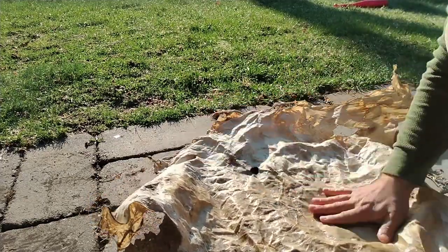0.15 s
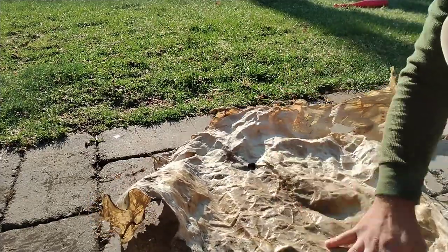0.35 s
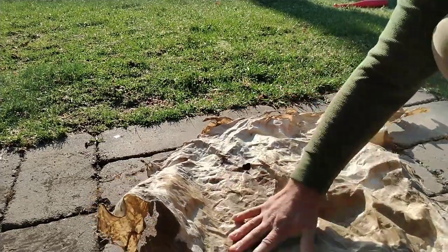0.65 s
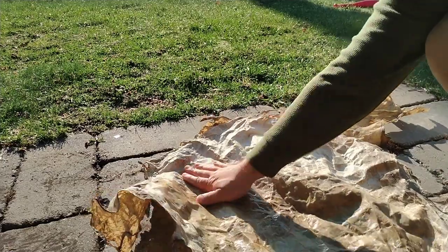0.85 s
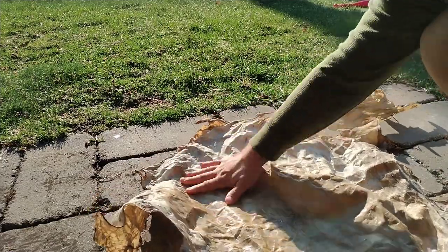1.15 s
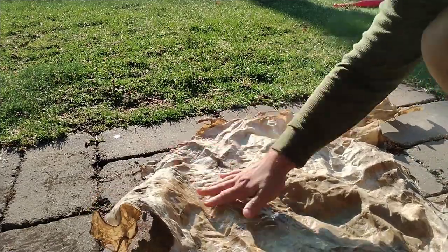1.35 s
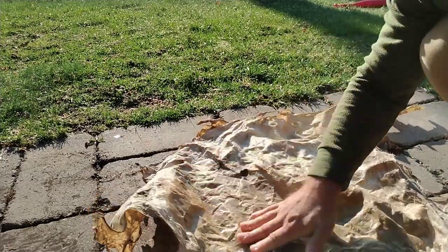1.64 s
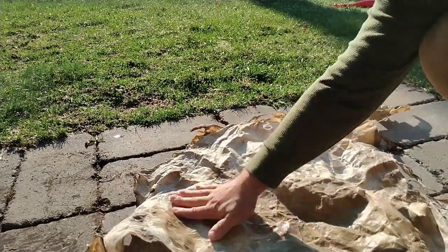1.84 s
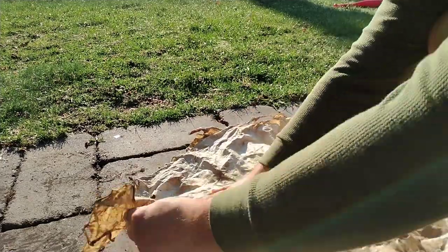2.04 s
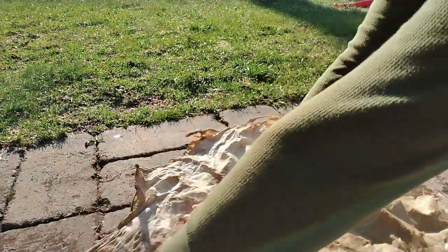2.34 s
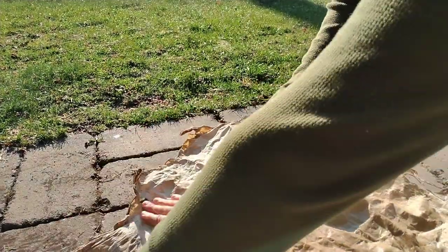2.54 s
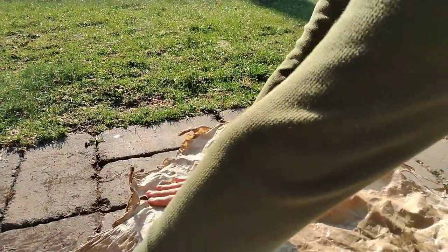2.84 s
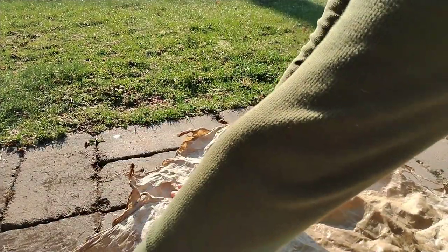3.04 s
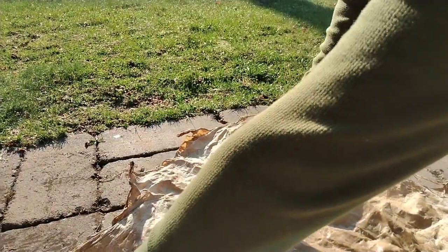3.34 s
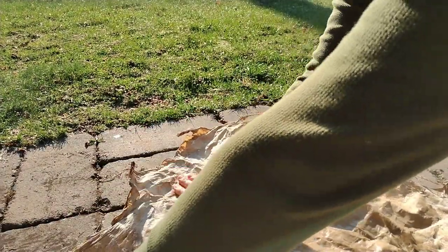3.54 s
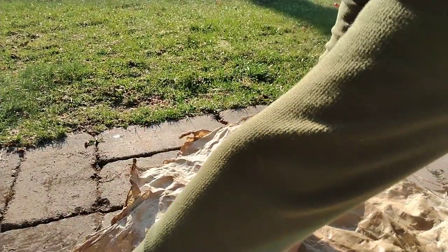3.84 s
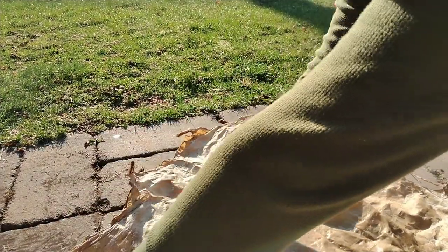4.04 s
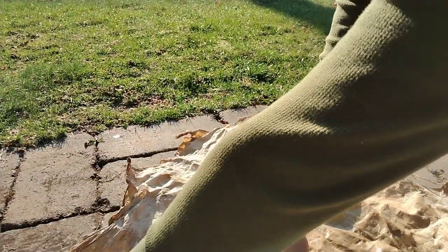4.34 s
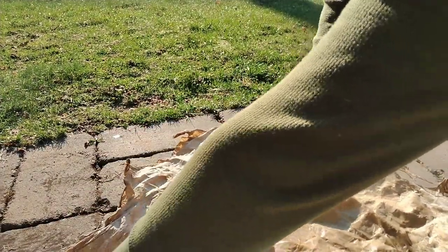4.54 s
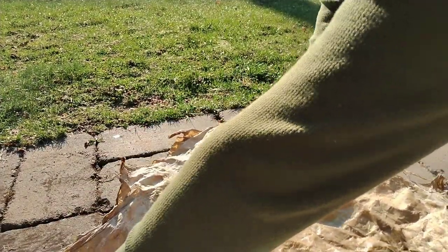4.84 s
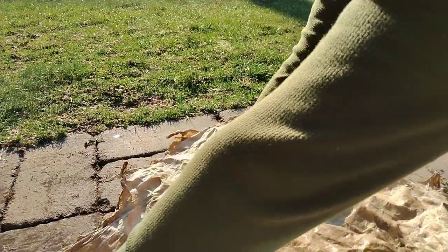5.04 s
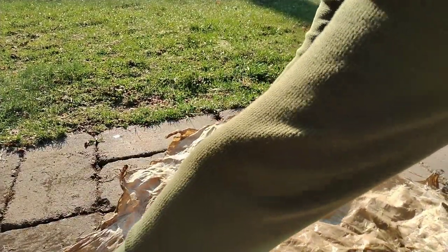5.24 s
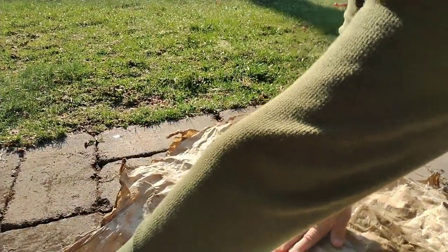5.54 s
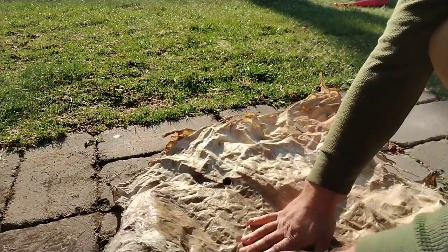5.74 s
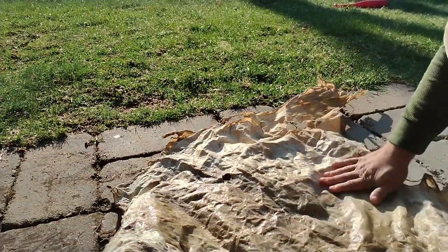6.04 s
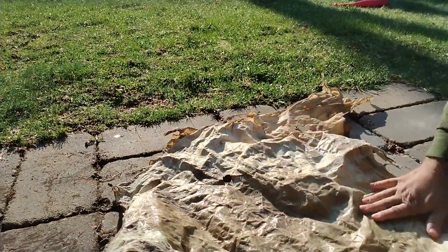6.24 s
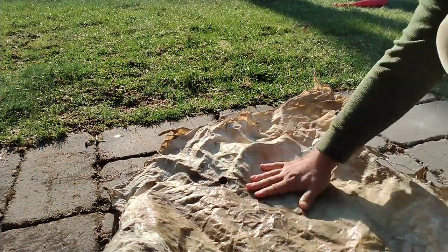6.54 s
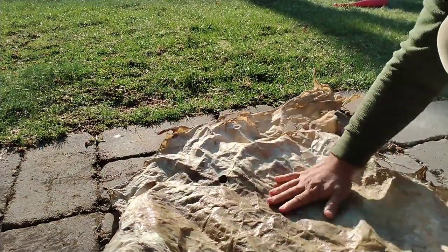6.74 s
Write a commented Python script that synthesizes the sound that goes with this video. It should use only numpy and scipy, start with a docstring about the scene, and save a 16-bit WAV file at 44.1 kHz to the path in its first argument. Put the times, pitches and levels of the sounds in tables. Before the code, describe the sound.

Very close outdoors, hands push and rub a stiff dried hide lying on paving. Short scrapes of skin on rough hide come in quick uneven runs, mixed with hollow papery knocks, bright ticks and sharp creasing cracks. The strongest rub comes just before two seconds, a dense snapping cluster follows around two and a half, and later pushes are sparser. A very faint low traffic hum lies beneath. Wide, detailed stereo with little reverberation.

```python
"""Hands pressing a stiff, dried hide

Two hands press a stiff hide flat on garden paving in quick, irregular pushes. Skin and hide scrape in
countless tiny slips of hiss, and the bending sheet rings as a hollow papery knock. Creases snap with a
tick, a crack and a short ring; thin wrinkles mostly tick. The resting hands drag lightly, and a low ring
swells in four deep thuds as the weight shifts. Beneath lie a low hum, likely far traffic, and a faint tone.
"""
import sys
import numpy as np
from scipy import signal
from scipy.fft import rfft, irfft, next_fast_len
from scipy.io import wavfile
from scipy.ndimage import uniform_filter1d

SR = 44100
rng = np.random.default_rng(int(sys.argv[2]) if len(sys.argv) > 2 else 0)


def to_wav(sig):
    """Store sig (one row per channel, or 1-D mono) as 16-bit WAV at the path in sys.argv[1].

    Samples outside -1..1 are clipped; the rate is SR.
    """
    pcm = np.clip(np.atleast_2d(sig), -1, 1) * 32767
    pcm = np.round(pcm).astype(np.int16)
    wavfile.write(sys.argv[1], SR, pcm.T)  # frames by channels


N = 303408
TIME = np.arange(N) / SR
# Levels in the tables and functions are those of the sources, before the mix at the two microphone ports.


def from_db(db):
    """Turn decibels into a gain."""
    return 10 ** (np.asarray(db) / 20)


def rms_one(x):
    """Scale a sound to an rms (average strength) of one."""
    return x / np.sqrt(np.mean(x ** 2) + 1e-20)


def in_time(rows):
    """Join (seconds, value) rows into a curve with a value at every sample."""
    return np.interp(TIME, *np.transpose(rows))


def over_bins(points):
    """Join (Hz, value) rows into a curve over all frequencies of a long transform."""
    hz, value = np.transpose(points)
    bin_hz = np.fft.rfftfreq(next_fast_len(N), 1 / SR)
    return np.interp(np.log(bin_hz + 1), np.log(hz), value)


def shaped(x, gain):
    """Make each frequency louder or softer by its own gain."""
    size = next_fast_len(N)
    return irfft(rfft(x, size) * gain, size)[..., :N]


def band(x, low_hz, high_hz):
    """Keep mainly the frequencies between two limits."""
    limits = [low_hz, min(high_hz, .45 * SR)]
    sos = signal.butter(2, limits, "band", fs=SR, output="sos")
    return signal.sosfilt(sos, x + 1e-18)


def drift(rate_hz):
    """Wander slowly at random, with an rms of about one."""
    step = 40   # samples between the computed points
    r = np.exp(-2 * np.pi * rate_hz * step / SR)
    noise = rng.standard_normal(N // step + 2002)
    slow = signal.lfilter([1], [1, -2 * r, r * r], noise)[2000:]   # drop the filter's start-up
    return np.interp(np.arange(N) / step, np.arange(len(slow)), rms_one(slow))


def grains(per_s, size_db):
    """Scatter clicks of random sign; size_db is the mean of their random gains in decibels."""
    born = rng.random(N) < per_s / SR
    size = from_db(size_db * rng.exponential(1, N))
    return born * size * rng.choice([-1, 1], N)


def evened(x):
    """Hold the short-term rms of a stereo pair near one."""
    power = uniform_filter1d(np.mean(x ** 2, axis=0), SR // 60)
    power = uniform_filter1d(power, SR // 100)
    return x / np.sqrt(np.abs(power) + 1e-12)


# Colour of the faint hush around the hum. Each row: frequency in Hz, level in dB per Hz.
HUSH_COLOUR = [(48, -19.5), (105, 11), (160, 4), (220, 2), (300, -5.5), (700, -7.5), (2000, -19),
               (15000, -75)]


def traffic(drone_hz=127, waver_hz=7, throb_db=3, drone_db=-75.5, hush_db=-69.5):
    """A distant engine drone wavers in pitch and strength over the faint hush of the garden."""
    hush = rms_one(shaped(rng.standard_normal((2, N)), from_db(over_bins(HUSH_COLOUR))))
    pitch_hz = drone_hz + waver_hz * drift(19.6)
    throb = from_db(throb_db * drift(43))
    drone = rms_one(np.sin(2 * np.pi * np.cumsum(pitch_hz) / SR) * throb)
    return drone * from_db(drone_db) + hush * from_db(hush_db)


# A faint background tone. The one row: start in seconds, end in seconds, level in dB at its fullest.
FAR_TONE_SPAN = (4.24, 6.06, -70)


def far_tone(low_hz=510, high_hz=580):
    """A narrow band of noise gives a faint, hollow tone that comes and goes."""
    start, end, db = FAR_TONE_SPAN
    swell = np.sin(np.pi * np.clip((TIME - start) / (end - start), 0, 1))
    tone = rms_one(band(rng.standard_normal(N), low_hz, high_hz))
    return from_db(db) * np.sqrt(np.abs(swell)) * tone


# Shifts of the weight. Each row: start in seconds, peak level of the swell in dB.
WEIGHT_SHIFTS = [(2.98, -57), (3.028, -52), (3.112, -51), (3.185, -54)]


def thuds(hz=127, ring_s=0.015):
    """Shifts of the weight on the hands feed one low ring, so the soft thuds merge into a rumble."""
    swell = 0
    for start, db in WEIGHT_SHIFTS:
        age = np.maximum(TIME - start, 0) / ring_s
        swell = swell + from_db(db) * age * np.exp(1 - age)   # peaks at an age of one
    return np.sin(2 * np.pi * hz * TIME) * swell


def moves(t, start, length, attack_s=0.015, release_s=0.009):
    """Power of each move, one per row: it takes up quickly, holds and lets go."""
    since, length = t - start[:, None], length[:, None]
    attack = np.clip(since / attack_s, 0, 1)
    release = np.exp(-np.maximum(since - length, 0) / release_s)
    return (attack * release) ** 2


# Pushes of a hand. Each row: start in seconds, length in seconds, scrape level in dB,
# scrape brightness in dB per octave, flexing level in dB. Both levels come before the trims in scene().
HAND_PUSHES = [(0.095,0.14,-52,4,-65.5), (0.23,0.095,-45.5,-1,-49), (0.452,0.096,-46.5,1.5,-48),
               (0.545,0.087,-47,-2,-60), (0.615,0.051,-39.5,-1,-48.5), (0.726,0.068,-41,0.5,-52),
               (0.811,0.043,-44,-1.5,-43.5), (0.873,0.03,-46.5,3,-48.5), (0.941,0.042,-42.5,0,-47),
               (1.025,0.1,-45.5,0,-85), (1.194,0.058,-40.5,0.5,-53.5), (1.271,0.088,-45.5,0.5,-55.5),
               (1.485,0.145,-50.5,2,-57), (1.659,0.047,-47,-3.5,-56.5), (1.783,0.108,-42.5,3.5,-42.5),
               (1.919,0.04,-33.5,1,-34.5), (2.11,0.07,-60,-2,-54.5), (2.323,0.072,-49,-2,-46.5),
               (2.425,0.07,-39,-3,-45), (2.526,0.16,-46.5,-1.5,-58), (2.706,0.052,-41,2,-51),
               (2.8,0.11,-50,2,-60.5), (2.956,0.13,-54.5,-2,-56.5), (3.241,0.056,-52,0,-51.5),
               (3.312,0.02,-44,-1,-54), (3.424,0.125,-50,-1.5,-59), (3.633,0.11,-48.5,-1,-53.5),
               (3.742,0.055,-42.5,-2,-54.5), (3.892,0.06,-46.5,3,-52.5), (4.121,0.085,-47,1,-50.5),
               (4.231,0.13,-44,2.5,-56), (4.398,0.08,-43.5,1.5,-51), (4.487,0.105,-41.5,-0.5,-65),
               (4.632,0.02,-42.5,-0.5,-66), (4.727,0.12,-46,2,-59.5), (4.851,0.068,-45.5,3,-62),
               (4.994,0.046,-42.5,3,-54), (5.065,0.11,-43.5,4,-64), (5.331,0.019,-44.5,2,-75),
               (5.386,0.14,-51,0.5,-62), (5.548,0.06,-50,0.5,-52.5), (5.671,0.045,-50,1,-55),
               (5.794,0.05,-44,-0.5,-47), (5.967,0.115,-49.5,-1,-56.5), (6.232,0.075,-46,3.5,-62.5),
               (6.509,0.1,-50,3,-59.5), (6.594,0.052,-48.5,-0.5,-56), (6.686,0.056,-48.5,3.5,-61),
               (6.79,0.055,-45,-2,-47.5)]
# Light drags of the resting hands. Each row: start in seconds, end in seconds, scrape level in dB before the trim.
LIGHT_TOUCHES = [(0, 0.418, -55), (0.434, 1.434, -56), (1.464, 2.026, -51.5), (2.103, 2.401, -59.5),
                 (2.415, 3.329, -53), (3.322, 5.285, -55), (5.305, 5.646, -60.5), (5.674, 5.827, -60),
                 (5.935, 6.357, -56), (6.422, 6.883, -52.5)]
# a resting hand flexes the sheet less than it scrapes; left alone, the hide still settles faintly
TOUCH_FLEX_DB, SETTLE_DB = -13.5, -74


def hands():
    """Add the powers of all moves to get scrape dB, brightness and flexing dB at every sample."""
    t = TIME[::44]
    start, end, touch_db = np.transpose(LIGHT_TOUCHES)
    touch = from_db(touch_db) ** 2 @ moves(t, start, end - start) + from_db(SETTLE_DB) ** 2
    start, length, rub_db, bright, flex_db = np.transpose(HAND_PUSHES)
    push = moves(t, start, length)
    rubs = from_db(rub_db)[:, None] ** 2 * push
    flexes = from_db(flex_db)[:, None] ** 2 * push
    rub = rubs.sum(0) + touch
    flex = flexes.sum(0) + touch * from_db(TOUCH_FLEX_DB) ** 2
    brightness = bright @ rubs / rub   # the stronger move counts for more
    controls = 10 * np.log10(rub), brightness, 10 * np.log10(flex)
    return [np.interp(TIME, t, control) for control in controls]


# Basic colour of the scrape. Each row: frequency in Hz, relative level in dB.
RUB_COLOUR = [(100, -15), (400, -8), (1000, -0.5), (3200, 0), (13000, -2.5), (16000, -12)]
PIVOT_HZ = 4960   # the scrape turns brighter or duller about this pitch


def scrape(rub_db, bright, per_s=4500, size_db=-1.7, wander_db=2.5, judder_db=2.5, count=7):
    """The hand sticks and slips on ridges; each slip is a tiny hiss, coloured by the patch it crosses."""
    power_decay = np.exp(-1 / (.0008 * SR))   # each slip loses its power within about a millisecond
    power = signal.lfilter([1], [1, -power_decay], grains(per_s, size_db) ** 2 + 1e-18)
    hiss = rng.standard_normal((2, 2, N)) * np.sqrt(power)
    edges, out = np.r_[100, np.geomspace(1000, 20000, count)], 0
    for k, (low, high) in enumerate(zip(edges, edges[1:])):
        octaves = max(np.log2(np.sqrt(low * high) / PIVOT_HZ), -1.2)
        gain = from_db(bright * octaves + wander_db * drift(8.9))
        out = out + band(hiss[k % 2], low, high) * gain   # neighbouring bands get unrelated noise
    even = evened(shaped(out, from_db(over_bins(RUB_COLOUR))))
    return even * from_db(rub_db + judder_db * drift(47.0))


# Basic colour of the ringing sheet. Each row: frequency in Hz, relative level in dB.
FLEX_COLOUR = [(80, -17), (220, -2), (270, -13), (350, 0.5), (520, 1.5), (680, 5.5), (1050, 3.5),
               (1450, 4.5), (5000, -29)]


def sheet(flex_db, fold_hz, per_s=1000, size_db=2.0, ring_s=0.002, reach_octaves=0.29, far_share=0.27,
          judder_db=4.0, count=20):
    """Small bucklings ring the damped modes of the sheet, most of all near the pitch of the pressed fold."""
    t, fold = np.arange(SR // 40) / SR, np.log2(fold_hz)
    buckles, out = grains(per_s, size_db), 0
    for hz in np.geomspace(200, 1800, count):
        near = far_share + np.exp(-.5 * ((np.log2(hz) - fold) / reach_octaves) ** 2)
        decay = np.exp(-t / ring_s * np.sqrt(hz / 600))   # higher modes die sooner
        mode = np.sin(2 * np.pi * hz * t) * decay * hz ** .75
        knocks = buckles * near * rng.standard_normal((2, N))
        out = out + signal.oaconvolve(knocks, mode[None], axes=1)[:, :N]
    even = evened(shaped(out, from_db(over_bins(FLEX_COLOUR))))
    return even * from_db(flex_db + judder_db * drift(24.5))


def crinkles(rub_db, flex_db, fold_hz, per_s=70, spread_db=8):
    """Lesser creases give way at random, mostly in pushes: bending sets their ring, rubbing their tick."""
    draws = rng.random((round(per_s * N / SR), 5))
    strain = np.cumsum(from_db(0.28 * rub_db))   # grows faster while the hand rubs harder
    at = np.searchsorted(strain, draws[:, 0] * strain[-1])
    usual = np.column_stack([flex_db[at] - 3.5, rub_db[at] - 14.5, rub_db[at] - 11.5])
    usual = np.minimum(usual, -51)   # small creases hold little energy
    pitch_hz = fold_hz[at] * 2 ** ((draws[:, 1] - .5) / 2)
    levels_db = usual + spread_db * (2 * draws[:, 2:] - 1)
    return np.column_stack([TIME[at], pitch_hz, levels_db])   # rows as in CREASES


# Thin wrinkles. Each row: start in seconds, tick level in dB.
WRINKLES = [(0.14, -42.5), (0.373, -43.5), (0.746, -39), (0.787, -37), (0.818, -43), (0.872, -49),
            (1.679, -41.5), (1.8843, -34), (1.91, -38), (2.309, -53), (2.4796, -36), (2.517, -46),
            (2.534, -40), (2.665, -39), (2.813, -39.5), (2.895, -51), (3.392, -44.5), (3.729, -43),
            (3.886, -43.5), (4.252, -42), (4.677, -44), (4.7849, -35.5), (4.8292, -35), (4.869, -42),
            (4.886, -47), (4.962, -44.5), (5.078, -39.5), (5.1354, -39.5), (5.224, -41.5), (5.484, -42),
            (5.522, -44), (6.733, -52)]


def ticks(fold_hz, body_db=-14):
    """Thin, dry wrinkles tick brightly and hardly move the sheet, so ring and crack stay weak."""
    s, db = np.transpose(WRINKLES)
    return np.column_stack([s, np.interp(s, TIME, fold_hz), db + body_db, db + body_db, db])   # as in CREASES


# Creases snapping through. Each row: start in seconds, ring pitch in Hz, ring level in dB,
# crack level in dB, tick level in dB.
CREASES = [(0.02, 1154, -44, -49.5, -44.5), (0.285, 720, -50, -47, -50.5), (0.488, 1070, -60, -42, -39),
           (0.5141, 1000, -49, -40, -43), (0.533, 795, -56, -57, -38), (0.5863, 1360, -38, -33, -48),
           (0.658, 1270, -40, -46, -33), (0.726, 960, -50, -43.5, -62), (0.8528, 940, -36.5, -45, -55),
           (0.963, 756, -42, -52, -53), (1.235, 740, -47, -48, -39), (1.3329, 830, -45, -42, -39),
           (1.613, 510, -39.5, -67, -44), (1.802, 780, -44, -41, -39), (1.8302, 810, -36.5, -45, -46),
           (2.006, 725, -47, -49, -42), (2.139, 755, -46, -62, -62), (2.3695, 550, -43.5, -50, -38.5),
           (2.4362, 690, -36, -37, -41), (2.4457, 800, -36.5, -47, -37), (2.491, 1210, -34.5, -53, -28.5),
           (2.564, 1010, -43.5, -41, -37), (2.589, 1075, -39, -32.5, -45), (2.678, 890, -40.5, -58, -36.5),
           (2.751, 960, -40.5, -49, -57), (2.826, 1140, -44.5, -50, -49), (2.93, 1040, -44, -48.5, -49),
           (2.982, 980, -39.5, -66, -47), (3.222, 1100, -48, -48.5, -60), (3.4766, 965, -36.5, -37, -47),
           (3.5272, 1050, -54, -38.5, -44), (3.762, 900, -44, -41, -40), (3.951, 930, -43, -37, -41.5),
           (4.0027, 990, -40, -39, -47), (4.022, 1070, -46.5, -48, -47), (4.284, 1000, -57, -39.5, -55),
           (4.4365, 970, -36, -55, -44), (4.643, 960, -56, -60, -37.5), (4.911, 1060, -38.5, -49.5, -45),
           (5.094, 925, -45, -63, -57), (5.116, 855, -60, -52, -52), (5.27, 1070, -51.5, -55, -29.5),
           (5.381, 754, -48, -54, -49), (5.462, 1090, -59, -42, -42), (5.565, 950, -66, -55, -43.5),
           (5.741, 1060, -47, -54, -51), (5.815, 664, -40.5, -56, -52), (5.842, 414, -42.5, -47.5, -47.5),
           (5.984, 1030, -43, -58, -65), (6.253, 700, -43, -43.5, -59), (6.43, 754, -47, -68, -64),
           (6.6072, 1050, -46, -45, -50), (6.634, 723, -39.5, -44.5, -48), (6.743, 753, -45.5, -58, -66)]


def snaps(rows, tick_s, tick_q, ring_s=0.0011, tail_s=0.017, tail_db=-24, crack_hz=1700, tick_hz=7960):
    """A crease flips with a sharp tick, a crack and a few cycles of its fold, then a short shiver."""
    t, out = np.arange(SR // 25) / SR, np.zeros((2, N + SR))
    start, hz, ring, crack, tick = np.transpose(rows)[..., None, None]

    def level(x, db):
        """Set the rms that the burst has when spread over five milliseconds."""
        return x * from_db(db) / np.sqrt(np.sum(x ** 2, axis=-1, keepdims=True) / (SR // 200))

    def burst(decay_s):
        """Noise builds as the flip runs along the crease, then dies with a faint longer tail."""
        build = 1 - np.exp(-4 * t / decay_s)
        fall = np.exp(-t / decay_s) + from_db(tail_db) * np.exp(-t / tail_s)
        return rng.standard_normal((len(rows), 2, len(t))) * build * fall

    def coloured(x, centre_hz):
        """Each crease has its own resonance; tick_q sets its sharpness and its random spread in octaves."""
        own_hz = centre_hz * 2 ** (tick_q * (rng.random(start.shape) - .5))
        detune = (np.fft.rfftfreq(len(t), 1 / SR) + 1) / own_hz
        return irfft(rfft(x) / (1 + 1j * tick_q * (detune - 1 / detune)) ** 2, len(t))

    # larger folds are lower, take longer to swing up and die, and reach both ports more nearly in step
    swell = t / ring_s * hz / 1000
    offset_s = 0.00024 * rng.standard_normal((len(rows), 2, 1))
    fold = np.sin(2 * np.pi * hz * (t + offset_s)) * swell * np.exp(-swell)
    bodies = level(band(fold + burst(2 * ring_s), 355, 1550), ring)
    cracks = level(coloured(burst(tick_s), crack_hz), crack)
    sharp_ticks = level(coloured(burst(tick_s / 2), tick_hz), tick)
    for s, snap in zip(start.ravel(), bodies + cracks + sharp_ticks):
        at = round(s * SR)
        out[:, at:at + len(t)] += snap
    return out[:, :N]


# How alike left and right are. Each row: frequency in Hz, likeness from 0 (unrelated) to 1 (the same).
PORT_LIKENESS = [(100, 0.93), (450, 0.71), (700, 0.37), (1000, 0.2), (2500, 0)]


def at_ports(pair):
    """Long waves reach both microphone ports nearly alike, short ones differ."""
    turn = np.arcsin(np.clip(over_bins(PORT_LIKENESS), 0, 1)) / 2
    return shaped(pair, np.cos(turn)) + shaped(pair[::-1], np.sin(turn))


def scene():
    """The hide close by, the traffic far off."""
    rub_db, bright, flex_db = hands()
    fold_hz = in_time(np.array(CREASES)[:, :2])   # the hands bend the same folds that snap
    rubbing = from_db(-0.5) * scrape(rub_db, bright)     # trims in dB
    flexing = from_db(-1) * sheet(flex_db, fold_hz)
    small = snaps(crinkles(rub_db, flex_db, fold_hz), tick_s=.0008, tick_q=1.7)
    thin = snaps(ticks(fold_hz), tick_s=.0013, tick_q=.9)
    large = snaps(CREASES, tick_s=.0013, tick_q=.7)
    hide = rubbing + flexing + small + thin + large
    return at_ports(traffic() + far_tone() + thuds() + hide)


# Colour of the two microphone ports. Each row: frequency in Hz, left minus right in dB.
PORT_COLOUR = [(130, 1.5), (720, 0.8), (1000, 7.5), (1450, 0.5), (2100, -6), (3400, 0), (5500, 0),
               (7800, -7), (10000, 2), (12500, 9.5), (15000, 8)]
CUTOFF_HZ = 15800


def record(dry):
    """Each port gets half the left-right difference, in opposite directions; the top is cut."""
    heard = shaped(dry, from_db(over_bins(PORT_COLOUR) * np.array([[.5], [-.5]])))
    top_cut = signal.ellip(10, .2, 80, CUTOFF_HZ, fs=SR, output="sos")
    return signal.sosfilt(top_cut, heard)


dry = scene()
out = record(dry)
to_wav(out)
```